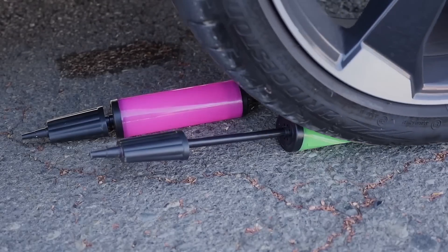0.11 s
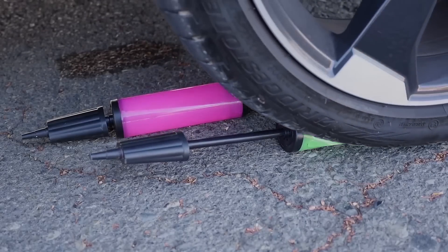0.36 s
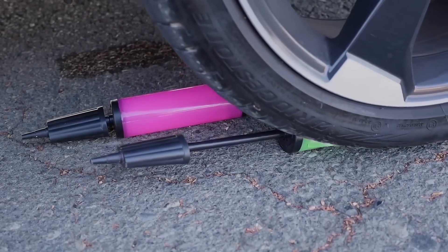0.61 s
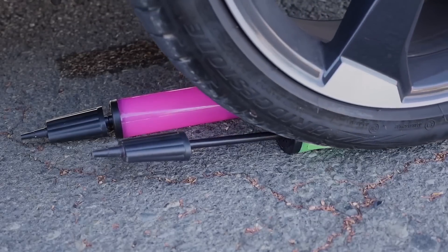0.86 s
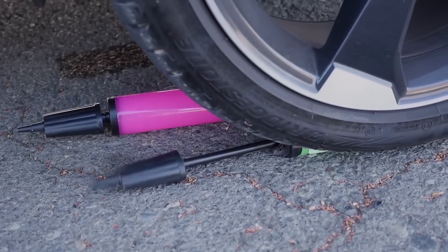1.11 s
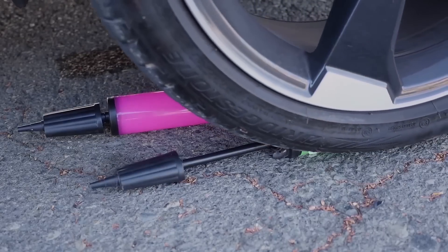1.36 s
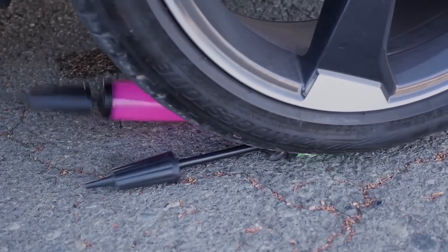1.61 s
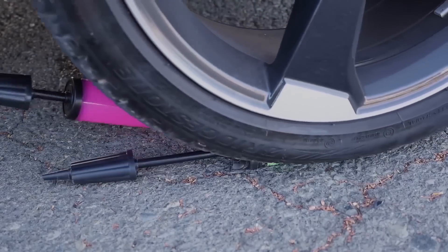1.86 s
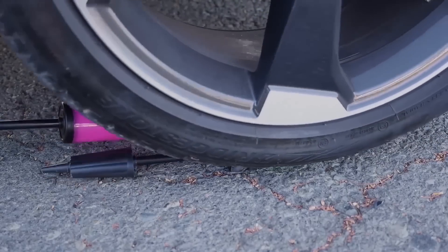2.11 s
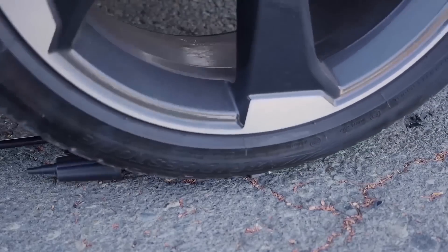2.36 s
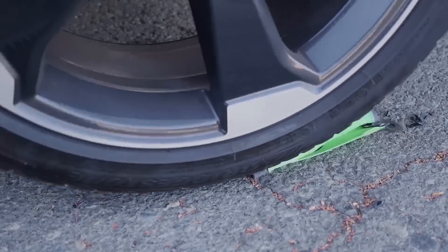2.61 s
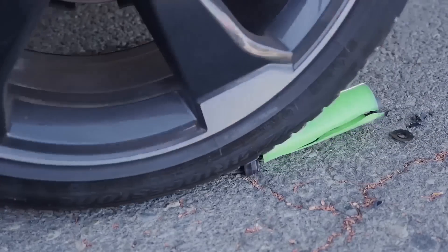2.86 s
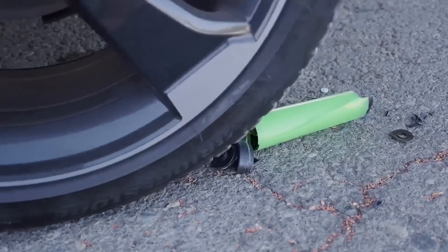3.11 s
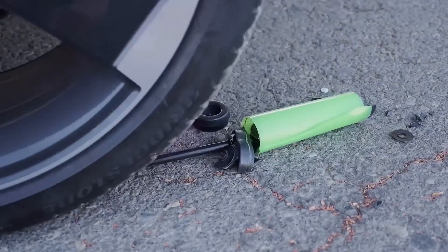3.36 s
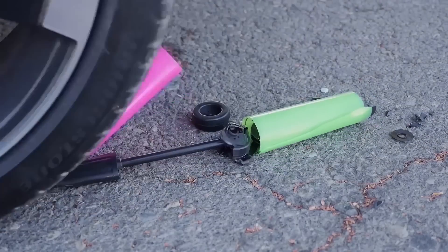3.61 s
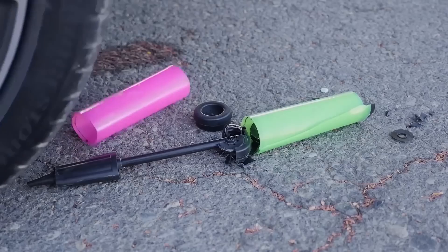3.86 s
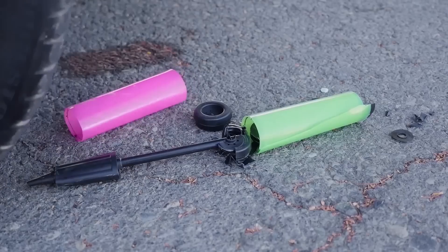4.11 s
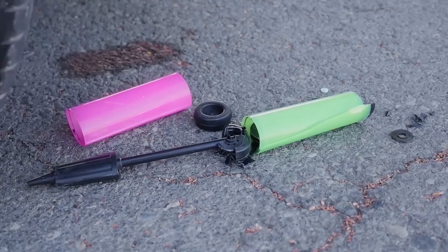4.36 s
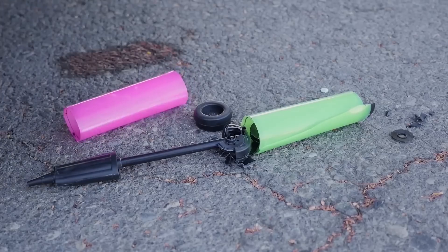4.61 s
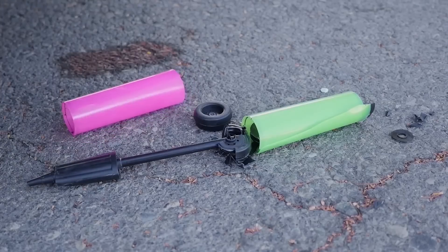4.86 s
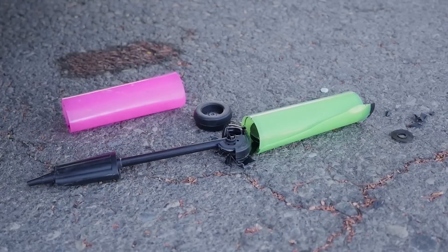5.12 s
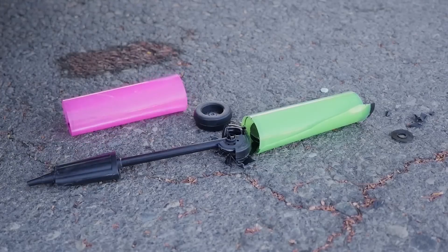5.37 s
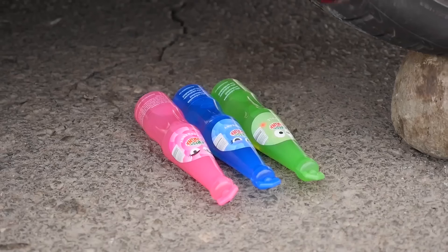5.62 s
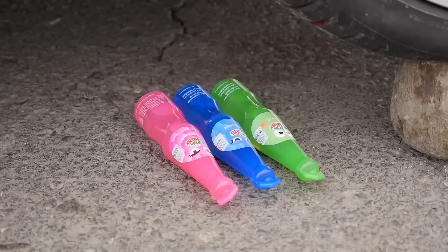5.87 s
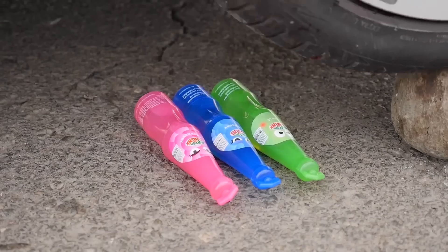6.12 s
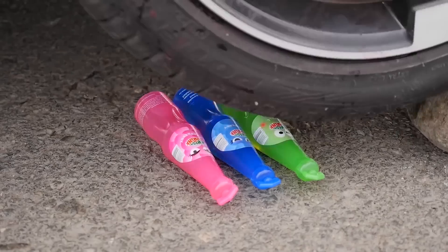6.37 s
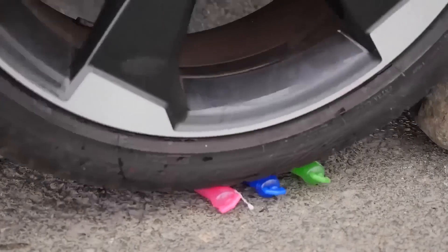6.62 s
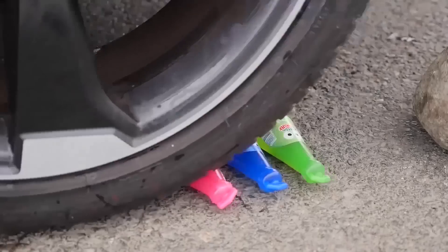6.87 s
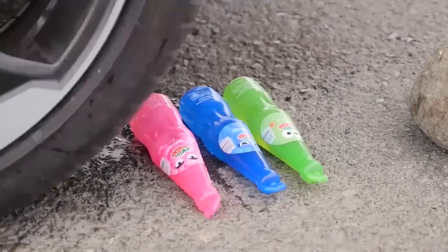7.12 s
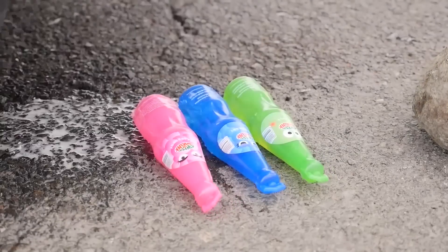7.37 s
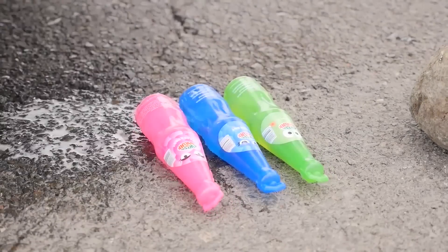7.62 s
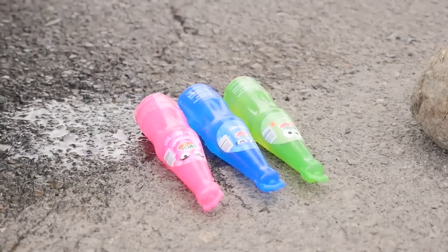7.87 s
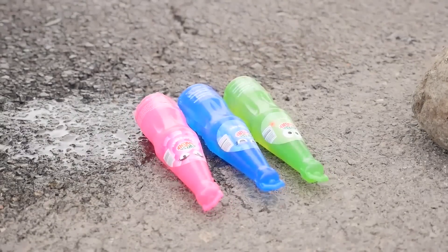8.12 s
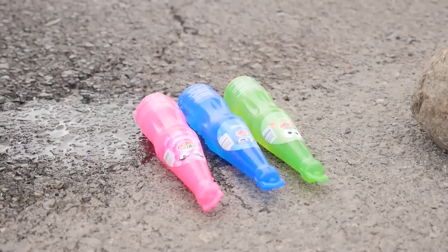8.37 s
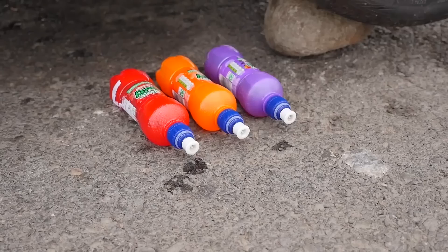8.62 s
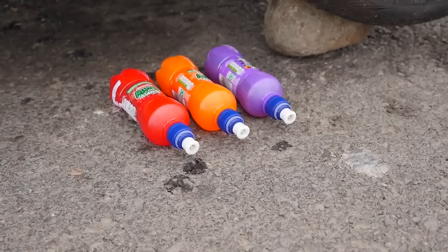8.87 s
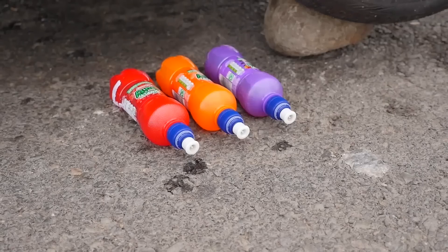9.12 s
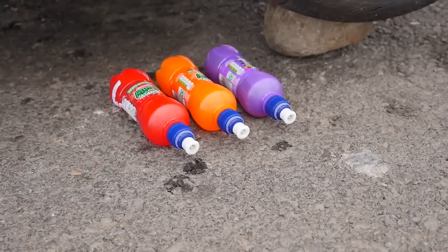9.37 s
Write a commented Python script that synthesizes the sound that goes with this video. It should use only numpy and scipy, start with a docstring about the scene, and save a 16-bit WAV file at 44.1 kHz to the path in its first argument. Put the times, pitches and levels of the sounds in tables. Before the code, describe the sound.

Close outdoors on asphalt, a small overloading microphone hears brittle plastic pumps crack under a creeping tyre, sparse at first, then in dense violent snaps and crunches. A freed hollow tube knocks and rocks to rest. The engine fades, then returns abruptly louder with a thin whine; the tyre thumps down and plastic bottles pop with a short wet spray. A final cut leaves faint idle.

```python
"""Car crushing plastic pumps and bottles

A car creeps over plastic hand pumps, then over small drink bottles, in three shots cut together.
Cracks are short noise blasts that knock a shell; crunches and spray are dense random grains.
A hollow tube and loose pieces bounce and rattle as dying sines; the tyre lands with a low thump,
then bottles burst as cracks with mostly longer aftershocks. Below lie an idling engine of shaped
noise and a thin whine of wavering sines; loud peaks overload."""
import sys
import numpy as np
from scipy import signal
from scipy.io import wavfile
from scipy.ndimage import uniform_filter1d

SR = 44100
rng = np.random.default_rng(int(sys.argv[2]) if len(sys.argv) > 2 else 0)


def digitize_waveform(pressure):
    """Quantize a signal to 16-bit integers and store it at the path in sys.argv[1].

    Rows of a 2-D input are taken as channels; values are limited to [-1, 1].
    """
    field = np.atleast_2d(pressure).T
    bounded = np.clip(field, -1, 1)
    quanta = np.round(bounded * 32767).astype(np.int16)
    wavfile.write(sys.argv[1], SR, quanta)


def invert_db(x):
    """Field ratio 10**(x/20) for x, a level in decibels (scalar or array-like)."""
    u = np.asarray(x, float) / 20
    return 10 ** u


N = 419391


def crack(db, treble_db, hz, body_db, t60):
    """A fracture: a 2 ms blast, a weaker aftershock whose treble dies first, and the knocked shell."""
    t, t60 = np.arange(5000) / SR, np.clip(t60, .008, .1)
    noise = rng.standard_normal((3, 5000))
    blast = invert_db(-60 * (t / 0.0024) ** 2)
    snap = peaked(band(noise[0] * (blast + 0.54 * dying(t, t60)), 1200, 5410))
    treble = peaked(band(noise[1] * (blast + 0.54 * dying(t, 0.45 * t60)), 4300, 14030))
    knock = noise[2] * (blast + 0.49 * dying(t, 1.27 * t60))
    shell_ring = peaked(signal.fftconvolve(knock, ring(t, [(hz, 0, 0.48 * t60)]))[:5000])
    body = peaked(shell_ring + .5 * peaked(band(knock, 200, 3000)))
    return invert_db(db) * (snap + invert_db(treble_db) * treble + invert_db(body_db) * body)


# Brittle plastic cracking under the tyre. Each row: start in seconds, level of the snap in dB,
# treble in dB over the snap, pitch of the body in Hz, body in dB over the snap.
CRACK_ROWS = [(.0401, 1, 3.5, 1480, -1), (.0933, -27.5, -6, 1130, -19.5), (.1069, -36, -11, 1890, -24),
              (.157, -34, 3, 1170, -20), (.227, -29, -3.5, 1170, -17.5), (.8771, -27.5, -13, 1710, -2),
              (.9166, -26.5, -17.5, 1720, -2.5), (.9483, -15, -10.5, 1630, -2.5),
              (.9929, -20.5, -19, 1430, 4), (1.0096, -36, -19, 730, 3), (1.021, -30, -3.5, 900, -15),
              (1.0889, -2.5, -5, 1300, -3.5), (1.1301, -23, 1.5, 1320, 11), (1.1661, -4.5, 4, 652, 1),
              (1.1786, -25.5, -1, 652, -5.5), (1.2012, -37.5, 3.5, 600, -6), (1.209, -46, 3, 600, -16),
              (1.231, -7, 10, 640, -2.5), (1.244, -9.5, 4.5, 582, -6.5), (1.2534, -17, 0, 1410, 0.5),
              (1.4951, -34.5, -26, 1563, 9), (1.5512, -33, -28, 1590, 11), (1.653, -30, -26, 833, 8),
              (1.7229, -30.5, -14.5, 789, 7.5), (1.7678, -39, -18.5, 620, 16), (1.7781, -5.5, -4, 1200, 2),
              (1.7881, -18.5, -9, 1340, 2.5), (1.804, -16, -8, 800, 4.5), (1.813, -10, -3, 720, 2),
              (1.825, -10.5, 13.5, 959, 6.5), (1.83, -13.5, -4, 1000, 0), (1.8454, 6, -0.5, 1614, -4.5),
              (1.866, -25, -0.5, 1500, -4), (1.9141, -36, -15, 1190, -5), (1.9458, -35, -22, 650, -10.5),
              (1.9611, -42, 2, 1780, 9), (1.9966, -26, -15, 690, -17), (2.0427, -33, -2, 1424, 4),
              (2.1736, -8.5, -16, 1199, 0), (2.1888, -19, .5, 663, -6.5), (2.2098, -13, 3, 746, -4.5),
              (2.216, -29, -10, 900, 17.5), (2.2403, -23, -4.5, 670, -6), (2.2494, -28.5, -5, 723, 9.5),
              (2.264, -28, -4, 660, 4.5), (2.3068, -27.5, -1, 670, 2.5), (2.341, -32, -5, 655, 6.5),
              (2.3551, -23.5, 0.5, 664, 5.5), (2.3986, -33.5, -9, 856, 18.5),
              (2.4149, -8.5, 3.5, 804, -1.5), (2.4618, 7.5, -1, 600, -9.5), (2.5798, -37, -1.5, 854, 13),
              (2.5846, -29, 11.5, 759, 12), (2.6593, -15, -8.5, 500, -3), (2.6641, -6.5, -5, 1430, -14),
              (2.6862, -25.5, -17.5, 840, 4.5), (2.6909, -0.5, -6, 821, -0.5),
              (2.7359, -9, -15, 1880, -4.5), (2.8, -16, 15, 1556, 5), (2.8395, -14.5, 15, 897, -5.5),
              (2.9149, -3.5, 8, 1280, -3), (2.93, -10.5, 8, 1265, -4), (2.9524, -22, -13, 1887, -13),
              (2.963, -20.5, -14.5, 1890, -14), (3.0132, -42, -6, 1500, 16),
              (3.0275, -39.5, -11, 1550, 10.5), (3.0493, -3, -4.5, 1490, -10.5),
              (3.0676, -26, -16.5, 1650, -4.5), (3.0853, -6.5, -4.5, 694, -4.5),
              (3.0997, -17.5, -5.5, 1406, -15.5), (3.112, -28, -12.5, 1270, 4),
              (3.1178, -10.5, -6, 773, -4), (3.1251, -4, 2, 1770, -3.5), (3.1602, -17, 5.5, 710, -2),
              (3.1688, -16, -9.5, 1387, -2.5), (3.1891, -21, 4.5, 790, -0.5),
              (3.1938, -28.5, 9, 1080, -4.5), (3.2047, -18.5, -8, 1870, -6), (3.2146, -12, 4, 710, -3.5),
              (3.2326, -18.5, 4, 720, -10), (3.3745, -40, -14, 850, 9.5), (3.39, -40, -16, 825, 5),
              (3.4449, -27, -17, 1450, -16), (3.5201, -15.5, -11.5, 1690, 1), (3.5453, -28, -11, 770, -0.5)]


def cracks():
    """Single fractures of the pumps, each with a 22 ms aftershock."""
    return placed(CRACK_ROWS, lambda *row: crack(*row, t60=.022))


def creak():
    """A piece slips under the tread in six even, growing jerks, each a small crack."""
    start_s, gap_s = 2.1018, .0124
    first_db, growth_db = -30.5, 0.85
    jerks = [(start_s + k * gap_s, first_db + k * growth_db) for k in range(6)]
    return placed(jerks, lambda db: crack(db, treble_db=-3, hz=1020, body_db=4, t60=.022))


# The tyre lands with a low thump (first row), then bottles buckle and burst.
# Each row: start in seconds, level of the snap in dB, treble in dB over the snap, pitch of the body
# in Hz, body in dB over the snap, seconds for the aftershock to fall 60 dB.
LANDING_AND_BURST_ROWS = [(6.5047, -27.5, 3.5, 428, 21, .016), (6.613, -26, -15, 600, 2, 0.023),
                          (6.674, -25, 2.5, 443, 12.5, 0.038), (6.686, -24.5, -1.5, 555, 11, 0.041),
                          (6.7514, -3.5, -5, 1300, -6, 0.043), (6.78, -17.5, 4.5, 1480, -7, .03),
                          (6.8541, -9, -24, 1570, -7.5, 0.012), (6.8667, -7.5, -6.5, 1430, -5.5, 0.032),
                          (7.041, -34.5, -12.5, 1120, 10, 0.057), (7.049, -26, -19, 895, 1, 0.036),
                          (7.108, -31, -16, 940, 16.5, 0.027)]


def landing_and_bursts():
    """The tyre's landing, then the bottles giving way: cracks with aftershocks of their own length."""
    return placed(LANDING_AND_BURST_ROWS, crack)


# Small splinters snapping while the tyre presses. Each row: time in seconds, base level in dB
# before each splinter's random size is added.
SPLINTER_LEVEL = [(.06, -59), (.26, -38), (.32, -39.5), (.75, -55), (1.05, -32.5), (1.3, -49), (1.5, -50),
                  (1.77, -46.5), (2.05, -50.5), (2.5, -42.5), (3.2, -46), (3.35, -39.5), (3.42, -50),
                  (3.62, -44)]


def splinters():
    """Thirty kinds of small crack, each snapping at random moments with random size."""
    per_s, spread_db, t60_s = 41, 3, .03
    s, db = np.transpose(SPLINTER_LEVEL)
    level = invert_db(np.interp(np.arange(N) / SR, s, db, -120, -120))  # all but silent outside the table
    extra_db = spread_db * np.minimum(rng.exponential(1, N), 2)
    size = level * invert_db(extra_db) * (rng.random(N) < per_s / SR)
    kind, looks = rng.integers(0, 30, N), rng.random((30, 3))
    out = np.zeros(N)
    for k, (a, b, c) in enumerate(looks):
        sound = crack(0, -18 + 20 * a, 600 * 3 ** b, -8 + 16 * c, t60_s)
        out += signal.oaconvolve(size * (kind == k), sound)[:N]
    return out


def rush(length, db, treble_db, hz, fade_db, per_s, spread_db, lo_hz, width_hz):
    """Dense grains of random sign, partly through one resonance, that fade over their length."""
    t = np.arange(0, length, 1 / SR)
    chance, size, sign = rng.random((len(t), 3)).T
    grains = (chance < per_s / SR) * invert_db(-spread_db * np.log(size + 0.0036)) * np.sign(sign - .5)
    # shift the resonance down to 0 Hz, smooth there, shift back
    turn, r = np.exp(2j * np.pi * hz * t), np.exp(-np.pi * width_hz / SR)
    hollow = (turn * signal.lfilter([1 - r], [1, -r], grains / turn)).real
    low = evened(evened(band(grains, lo_hz, 3300)) + 1.1 * evened(hollow))
    high = invert_db(treble_db) * evened(dulled(band(grains, 5300, 15000), hz=4000))
    return invert_db(db + fade_db * t / length) * (low + high) * signal.windows.tukey(len(t), .15)


# Continuous crushing and scraping. Each row: start in seconds, length in seconds, level at the
# start in dB, treble in dB over the rest, resonance of the shell in Hz.
CRUNCH_ROWS = [(1.783, 0.056, -13.5, -5.5, 2200), (1.85, 0.018, -14, -16, 2020),
               (2.662, 0.017, -17.5, -0.5, 2350), (2.694, 0.016, -9.5, -3.5, 776),
               (2.85, 0.057, -29.5, -15, 1517), (2.935, 0.015, -31.5, 1, 1780),
               (3.012, 0.042, -40, -14.5, 1435), (3.095, .035, -28, -12.5, 1700),
               (3.245, 0.068, -34, -33, 1300), (3.293, 0.065, -30, -23, 855),
               (3.334, .07, -32, -36.5, 1300)]


def crunches():
    """Grains of uneven size ring in the crushed shell and fade by 12 dB."""
    grain = dict(fade_db=-12, per_s=4000, spread_db=1.5, lo_hz=410, width_hz=400)
    return placed(CRUNCH_ROWS, lambda *row: rush(*row, **grain))


# Drink spraying out of the split bottles. Each row: start in seconds, length in seconds, level at
# the start in dB, treble in dB over the rest, resonance of the split in Hz.
SPRAY_ROWS = [(6.752, .05, -17.5, -3.5, 5150), (6.802, 0.078, -25.5, -4, 1995),
              (6.888, 0.098, -28, -19, 3150), (7.032, 0.088, -29, -12, 1200)]


def spray():
    """Denser grains of equal size pass a broad resonance and fade by 10 dB."""
    grain = dict(fade_db=-10, per_s=6400, spread_db=0.0, lo_hz=600, width_hz=1300)
    return placed(SPRAY_ROWS, lambda *row: rush(*row, **grain))


# Fragments that ring on. Each row: start in seconds, level in dB, pitch in Hz, seconds to fall 60 dB.
SHELL_ROWS = [(2.74, -17, 1443, 0.041), (2.803, -17, 1700, 0.035), (2.843, -26, 1700, .04),
              (2.879, -29, 1400, 0.037), (2.9645, -7, 2610, 0.011), (3.175, -26, 1400, .035)]


def shells():
    """Each loose fragment rings on one mode."""
    t = np.arange(3000) / SR
    return placed(SHELL_ROWS, lambda db, hz, t60: invert_db(db) * shaken(t, [(hz, 0, t60)], t60=0.0035))


# The ways the tube rings. Each row: factor on its pitch, relative level in dB, seconds to fall 60 dB
# for a knock at or below 930 Hz (higher knocks die faster).
TUBE_MODES = [(1, 0, .036), (.82, -8, .024), (.5, -21, .04), (.66, -17, .02), (1.35, -15, .012),
              (2.15, -19, .01), (3.05, -21, .01)]


def bounce(db, tick_db, hz):
    """After a contact tick the tube's air column and wall swell for a moment and ring out."""
    t = np.arange(5000) / SR
    shorter = min(930 / hz, 1) ** 2
    modes = [(hz * factor, mode_db, t60 * shorter) for factor, mode_db, t60 in TUBE_MODES]
    swell = 1 - np.exp(-t / .0015)
    tube = peaked(band(shaken(t, modes, t60=.002) * swell, 360, 8200))
    scrape = peaked(band(rng.standard_normal(5000) * dying(t, 0.022), 600, 2700))
    contact = invert_db(tick_db) * tick(t, t60=0.0084, lo_hz=1300)
    return invert_db(db) * (tube + 0.36 * scrape + contact)


# A hollow tube drops, bounces and rocks to rest. Each row: start in seconds, level of the tube in dB
# before all bounces are scaled by 0.51, tick in dB over the tube, pitch in Hz.
BOUNCE_ROWS = [(3.643, -35, -19, 1300), (3.6504, -10, -5.5, 1465), (3.6854, -19, -24, 810),
               (3.7039, -16.5, -15.5, 990), (3.7198, -9.5, -17, 896), (3.7315, -26, 4, 1000),
               (3.7431, -19, 1.5, 1940), (3.7555, -34, -14, 814), (3.7925, -45, 11, 900),
               (3.8105, -52, 16, 890), (3.8857, -28, -6, 920), (3.9024, -3.5, -3, 837),
               (3.9894, -15.5, -9, 773), (4.0283, -2.5, 1.5, 966), (4.0356, -8, -4.5, 900),
               (4.09, -24.5, 6.5, 930), (4.1279, -19.5, -8, 810), (4.1361, -12.5, 0.5, 936),
               (4.1946, -26, -7, 900), (4.2046, -13.5, -0.5, 915), (4.2346, -27, 0, 905),
               (4.2582, -14.5, -6, 940), (4.2941, -11.5, -14, 870), (4.3019, -9, -9, 937),
               (4.3207, -19, -25, 930), (4.3359, -22.5, -3, 755), (4.3494, -21, -16, 875),
               (4.3615, -25, -9, 726), (4.3703, -21.5, -21, 940), (4.3839, -26, -3.5, 810),
               (4.4009, -17, -22, 940), (4.4136, -24, -18, 920), (4.4218, -20, -8, 910),
               (4.4423, -25, -12, 895), (4.4615, -35, -21, 940), (4.4748, -28.5, -14, 934),
               (4.4864, -37, -18, 910), (4.497, -38, -16, 910), (4.723, -39.5, -19, 906)]


def bounces():
    """The tube strikes the asphalt again and again until it lies still."""
    return 0.51 * placed(BOUNCE_ROWS, bounce)


# A small hard piece rattles down. Each row: start in seconds, level of the ringing in dB.
RATTLE_ROWS = [(1.2792, -18.5), (1.3055, -20), (1.3312, -26), (1.3554, -21.5), (1.3783, -26), (1.4004, -23),
               (1.4188, -24.5), (1.4357, -27.5)]
# The ways that piece rings. Each row: pitch in Hz, relative level in dB, seconds to fall 60 dB.
PIECE_MODES = [(4050, -4, .009), (6200, 0, .009), (6250, -25, .05), (4000, -30, .04), (7900, -13, .006),
               (9900, -11, .007), (12000, -15, .006)]


def rattle():
    """Each touch is a tick and the few high modes of a small piece."""
    t = np.arange(3000) / SR

    def touch(db):
        return invert_db(db) * (peaked(ring(t, PIECE_MODES)) + .35 * tick(t, t60=.006, lo_hz=2500))

    return placed(RATTLE_ROWS, touch)


def tick(t, t60, lo_hz):
    """The bright instant of contact with the asphalt and a short scuff after it."""
    contact = rng.standard_normal(len(t)) * (dying(t, t60) + 0.056 * dying(t, 0.039))
    return peaked(dulled(band(contact, lo_hz, 16000), hz=4940))


# The tyre drops as something under it collapses. Each row: start in seconds, level in dB
# before the deep bass is cut.
DROP_ROWS = [(1.167, -43), (1.846, -45.5), (2.11, -37), (2.174, -39.5), (2.463, -29), (2.692, -38.5),
             (6.507, -24.5), (6.675, -33)]
# Air ring and carcass of the tyre. Each row: pitch in Hz, relative level in dB, seconds to fall 60 dB.
TYRE_MODES = [(213.5, 3.5, 0.34), (450, -0.5, 0.22), (162, -25.5, 0.13)]


def tyre():
    """The air ring and carcass hum after each jolt, swelling in over 10 ms."""
    t = np.arange(SR // 2) / SR
    return placed(DROP_ROWS, lambda db: invert_db(db) * peaked(ring(t, TYRE_MODES) * np.minimum(t / 0.01, 1)))


# Echo under the car. Each row: frequency in Hz, seconds to fall 60 dB.
UNDERBODY_DECAY = [(200, 0.18), (800, 0.11), (2500, 0.11), (6000, 0.055), (14000, 0.013)]


def underbody(x):
    """Sparse reflections between asphalt, tyre and floor pan, each band dying at its own speed."""
    taps = np.zeros(SR // 2)
    at = np.arange(100, SR // 2 - 20, 20)
    taps[at + rng.integers(0, 20, len(at))] = rng.choice([-1., 1.], len(at))
    hz, t, z = signal.stft(taps, SR, nperseg=128)
    fading = dying(t, read(UNDERBODY_DECAY, hz)[:, None])
    tail = signal.istft(z * fading, SR, nperseg=128)[1]
    return signal.oaconvolve(x, tail / np.linalg.norm(tail))[:N]


# Engine tone: four spectra (near, rolled away, shot two, shot three).
# Each row: frequency in Hz, relative density in dB per Hz before the treble tilt.
ENGINE_SPECTRA = [
    [(15, -42), (25, -17.5), (154, -2), (296, -7.5), (445, 1.5), (787, -0.5), (878, 0), (1730, -4.5),
     (2600, -4), (3810, -12), (4130, -17), (4730, -13.5), (11900, -32), (15200, -37), (16500, -47.5)],
    [(15, -43.5), (25, -16), (74, -2), (273, -4), (339, -1), (1470, -3.5), (1640, -9.5), (1780, -4),
     (1930, -6), (2150, -6), (12900, -32), (15200, -31), (16500, -36.5)],
    [(15, -48), (25, -50), (90, 1), (378, -4.5), (433, 2), (831, -2.5), (1180, -3), (1880, -4.5),
     (2040, -4), (2210, -4.5), (2400, -3.5), (9080, -20), (11900, -18), (15200, -23.5), (16500, -45)],
    [(15, -45.5), (25, -22), (163, -9), (273, -19), (339, -7), (809, -10.5), (927, -9.5), (1510, -13),
     (2040, -11.5), (2530, -16), (2750, -14), (7920, -33), (12200, -34), (15200, -43), (16500, -46)],
]
# Treble tilt above 1 kHz in dB per octave, one value for each of the four spectra.
TREBLE_TILT = [1, 0.66, -0.46, 1.5]


def idle(shot):
    """Engine noise: random short-time spectra with drifting patches, changing with the shot."""
    frames, hz = N // 256 + 5, np.fft.rfftfreq(1024, 1 / SR)
    a, b, patches = rng.standard_normal((frames, 513, 3)).T
    patches = evened(uniform_filter1d(uniform_filter1d(patches, size=10, axis=0), size=10, axis=1))
    octaves = np.log2(np.maximum(hz, 1000) / 1000)
    out = np.zeros(N)
    for k, spectrum in enumerate(ENGINE_SPECTRA):
        gain = invert_db(read(spectrum, hz))
        gain /= np.sqrt(np.sum(gain[(hz > 200) & (hz < 4000)] ** 2))
        gain *= invert_db(TREBLE_TILT[k] * octaves)
        z = (a + 1j * b) * gain[:, None] * invert_db(1.76 * patches)
        out += (shot == k) * 0.66 * signal.istft(z, nperseg=1024, noverlap=768)[1][:N]
    return out


# Whine lines, several on multiples of one tone. Each row: pitch in Hz, width of its wander in Hz, then
# relative level in dB when near, rolled away, in shot two and in shot three.
WHINE_LINES = [(1200, 6, -37, -40, -18.5, -31), (1617, 7, -30.5, -17.5, -18.5, -27),
               (1999, 5, -32, -24.5, -12.5, -13), (2401, 5, -40, -40, -16, -19),
               (2803, 8, -38, -40, -26, -26), (3800, 60, -25, -40, -38, -33),
               (940, 40, -32, -30, -21.5, -14), (15070, 20, -54, -29, -60, -52)]
# Level added to every whine line. Each row: time in seconds, level in dB.
WHINE_RISE = [(0, 6.5), (1.8, 6.5), (2.2, -7.5), (4.5, -6), (4.7, -1), (5.9, 2.5), (6.5, -0.2), (7, -10),
              (7.5, .6), (8.1, -4), (8.2, 2.5), (8.4, 1), (8.5, -1.5), (8.72, 0.5), (9.5, 4.8)]


def whine(shot):
    """Thin electrical sines whose pitch and loudness waver slowly."""
    rise_db = np.interp(np.arange(N) / SR, *np.transpose(WHINE_RISE))
    drift = uniform_filter1d(rng.standard_normal((len(WHINE_LINES), N // 64 + 1, 2)), size=120, axis=1)
    out = np.zeros(N)
    for (hz, width_hz, *line_db), wander in zip(WHINE_LINES, drift):
        pitch, swell = (np.repeat(evened(w), 64)[:N] for w in wander.T)
        db = np.array(line_db)[shot] + rise_db + 1.9 * np.clip(swell, -2, 2)
        out += invert_db(db) * np.sin(2 * np.pi * np.cumsum(hz + width_hz * pitch / 2) / SR)
    return out


# When the car has rolled away, then the two cuts to new shots, in seconds.
CHANGES_S = [4.56, 5.606, 8.70]
# Level of engine and whine as the car creeps, rolls away and the shots change.
# Each row: time in seconds, level in dB before the dips under breakages.
CAR_LEVEL = [(0, -31), (.6, -30), (1.7, -31), (2.9, -28), (3.5, -40), (4.42, -37), (4.55, -47.5),
             (4.68, -55), (5.604, -50), (5.608, -29), (5.627, -18), (6.5, -17.5), (6.72, -18.5),
             (6.95, -29), (7.3, -25.5), (7.8, -23.5), (8.69, -26), (8.71, -41.5), (9.52, -41)]
# Factor on the depth of the dips: near, rolled away, in shot two, in shot three.
DIP_BY_SHOT = [0.98, 1.01, 1.04, 1.01]


def engine(breakage):
    """Idle and whine together; they sink under loud breakages, the bass more deeply."""
    bass_hz, bass_depth = 338, 1.7
    t = np.arange(N) / SR
    shot = np.searchsorted(CHANGES_S, t)
    out = idle(shot) + whine(shot)
    down_db = ducking(breakage) * np.array(DIP_BY_SHOT)[shot]
    bass = band(out, 12, bass_hz) * invert_db(-bass_depth * down_db)
    rest = band(out, bass_hz, 19000) * invert_db(-down_db)
    return (bass + rest) * invert_db(np.interp(t, *np.transpose(CAR_LEVEL)))


def ducking(x):
    """Basic depth in dB of the engine's dips: follows peaks of x at once, holds, then relaxes."""
    from_db, slope, hold_s, back_s = -19.5, .85, .11, .17
    step = 44  # samples, about 1 ms
    power_db = 10 * np.log10(uniform_filter1d(np.minimum(x ** 2, 1), size=176)[::step] + 1e-12)
    down, since, out = 0, 0, []
    for over in slope * (power_db - from_db):
        since += step / SR
        if over >= down:
            down, since = over, 0
        elif since > hold_s:
            down *= np.exp(-step / SR / back_s)
        out.append(down)
    return np.interp(np.arange(N), np.arange(len(out)) * step, uniform_filter1d(out, size=3))


def placed(rows, sound):
    """Makes a sound from each row and lays it at the row's start time."""
    mix = np.zeros(N)
    for s, *row in rows:
        made = sound(*row)
        part = mix[round(s * SR):][:len(made)]
        part += made[:len(part)]
    return mix


def dying(t, t60):
    """A decay that falls 60 dB in t60 seconds."""
    return invert_db(-60 * t / t60)


def ring(t, modes):
    """Sum of dying sines, as a struck object rings."""
    return sum(invert_db(db) * dying(t, max(t60, .004)) * np.sin(2 * np.pi * hz * t) for hz, db, t60 in modes)


def shaken(t, modes, t60):
    """Modes driven by a short rough contact, so no two blows ring alike."""
    contact = rng.standard_normal(len(t)) * dying(t, t60)
    return peaked(signal.fftconvolve(contact, ring(t, modes))[:len(t)])


def band(x, lo_hz, hi_hz):
    """Steep causal band-pass."""
    edges = [lo_hz, min(hi_hz, .45 * SR)]
    return signal.sosfilt(signal.butter(N=4, Wn=edges, btype="band", fs=SR, output="sos"), x)


def dulled(x, hz):
    """Gentle roll-off of the treble."""
    return signal.sosfilt(signal.butter(N=1, Wn=hz, fs=SR, output="sos"), x)


def evened(x):
    """Scales to rms 1."""
    return x / np.sqrt(np.mean(x ** 2) + 1e-20)


def peaked(x):
    """Scales so that the loudest 2 ms have rms 1."""
    return x / np.sqrt(uniform_filter1d(x ** 2, size=88).max() + 1e-20)


def read(points, hz):
    """Reads a curve of (Hz, value) points on a log-frequency axis."""
    f, value = np.transpose(points)
    return np.interp(np.log(hz + 1), np.log(f + 1), value)


def scene():
    """All breakages and the tyre with their echo, over the engine."""
    near = cracks() + creak() + landing_and_bursts() + splinters() + crunches() + spray()
    near += shells() + bounces() + rattle() + tyre()
    near = band(near, 150, 13000)  # the microphone takes up little deep bass from breakages and tyre
    return (near + invert_db(-21.5) * underbody(near) + engine(near))[None]


def top_cut(x):
    """Nothing passes above the cut-off."""
    return signal.sosfilt(signal.butter(12, 16720, fs=SR, output="sos"), x)


def record(dry):
    """The small microphone's input overloads: the loudest peaks are cut flat."""
    overloaded = np.clip(dry, -.97, .97)
    return top_cut(overloaded)


dry = scene()
out = record(dry)
digitize_waveform(out)
```